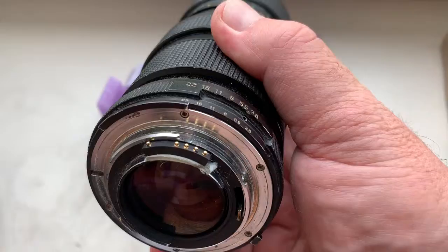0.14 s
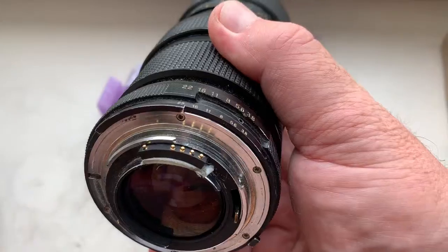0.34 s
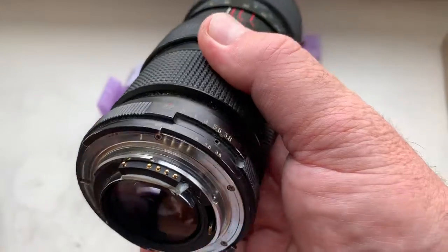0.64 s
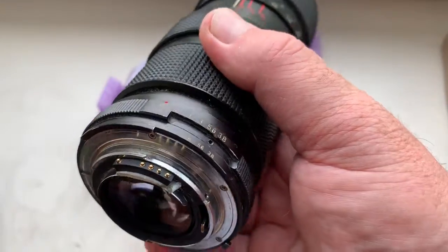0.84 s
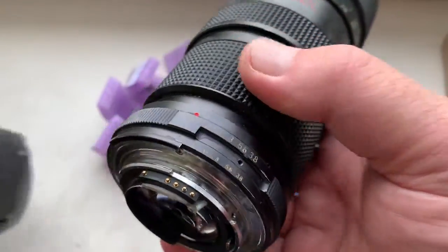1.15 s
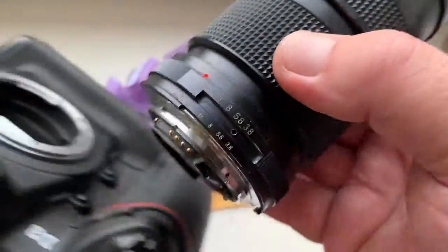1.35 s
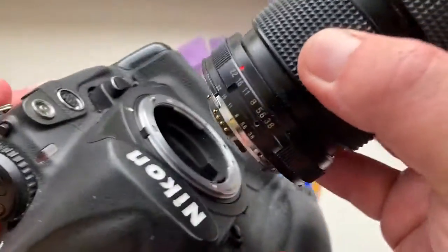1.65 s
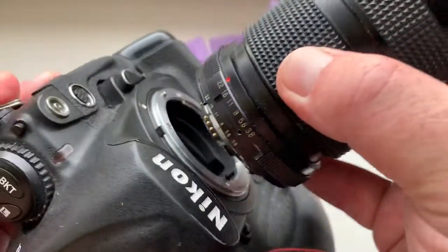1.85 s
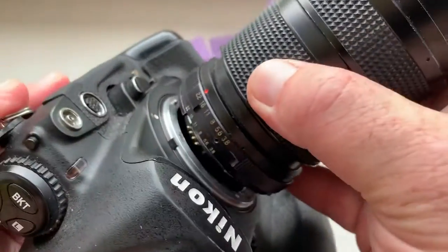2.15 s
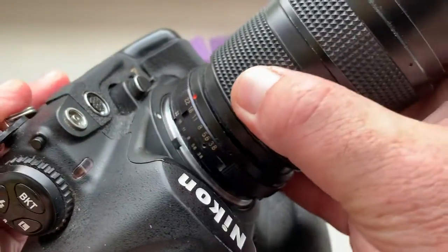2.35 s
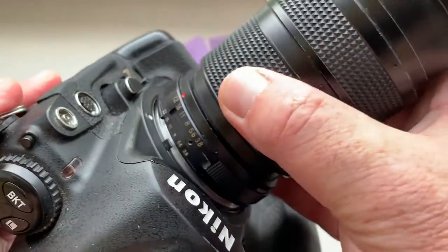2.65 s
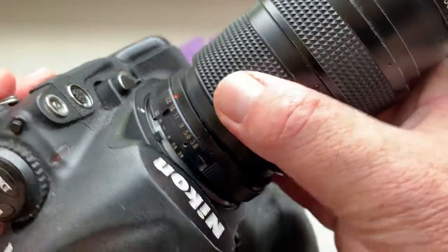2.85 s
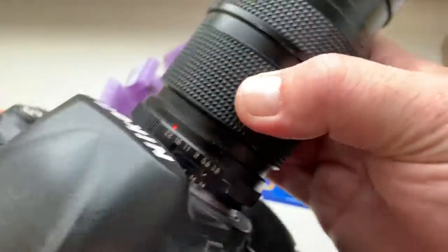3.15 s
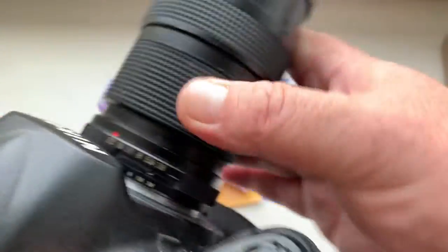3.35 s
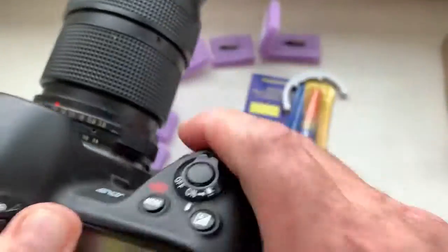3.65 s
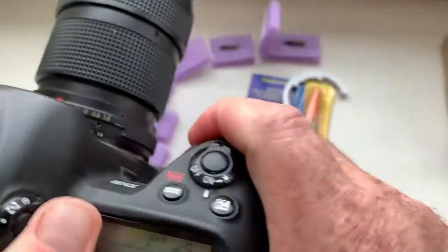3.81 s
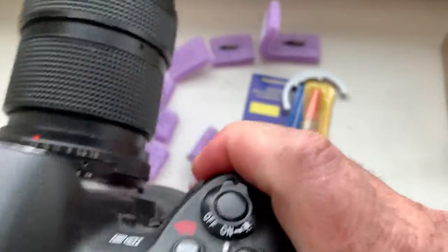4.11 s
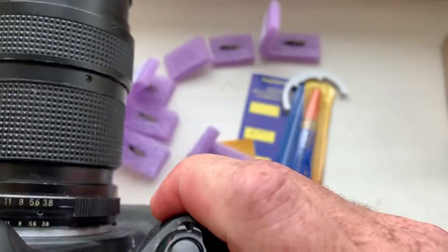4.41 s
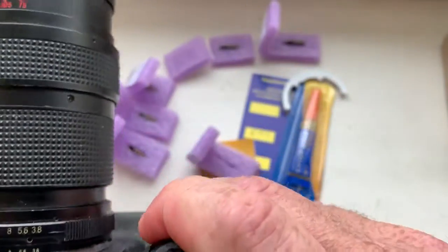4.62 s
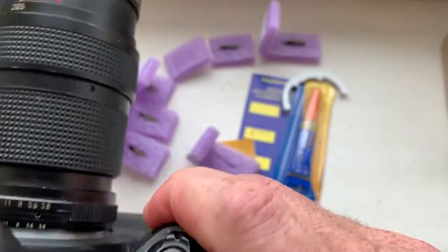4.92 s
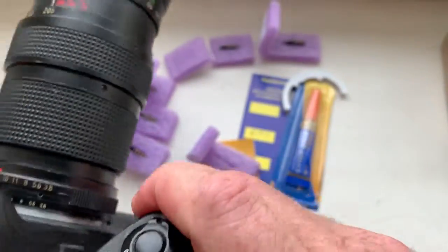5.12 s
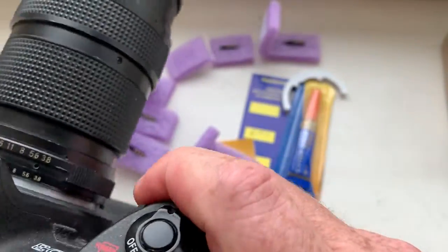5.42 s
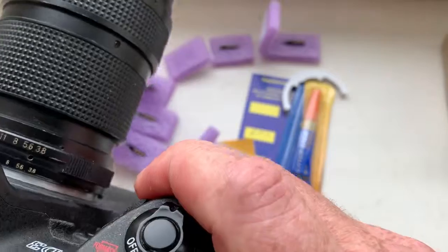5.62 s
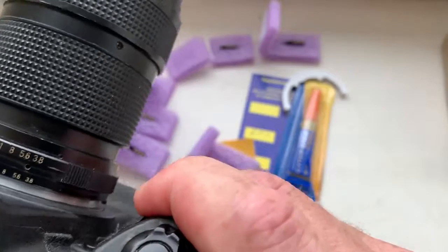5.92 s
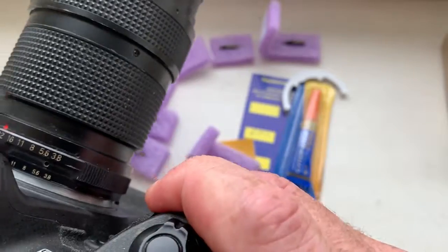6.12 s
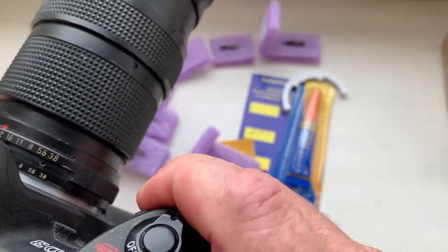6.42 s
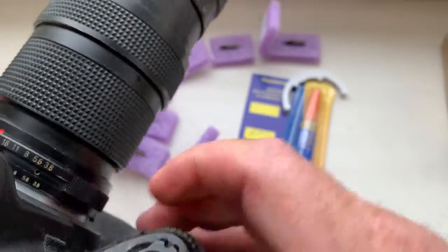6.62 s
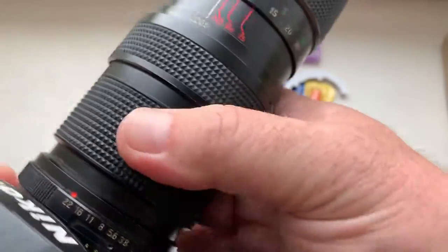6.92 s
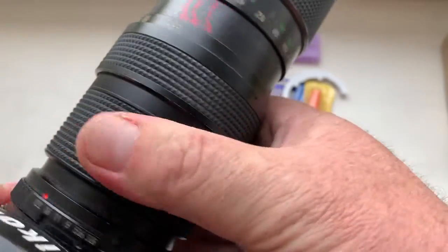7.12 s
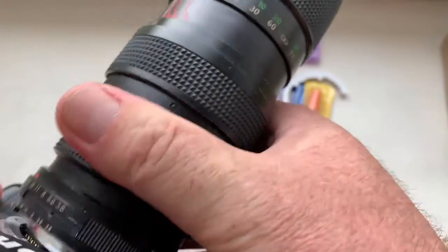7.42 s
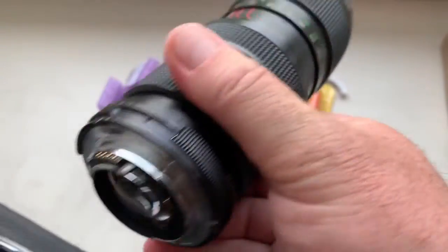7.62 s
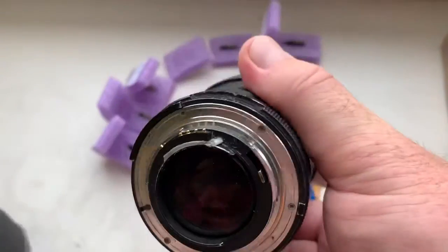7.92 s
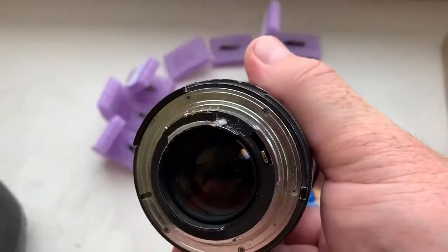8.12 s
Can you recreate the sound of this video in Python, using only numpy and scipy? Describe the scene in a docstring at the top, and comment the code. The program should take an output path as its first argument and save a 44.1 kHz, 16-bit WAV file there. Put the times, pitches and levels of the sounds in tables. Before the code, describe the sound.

Heard close by a phone, a lens meets a camera mount with ragged metallic clacks, knocks through a hollow shell and gritty twisting. A sharp crack locks it. Fingers then make light, crisp ticks and soft scuffs, with one stronger snap, before rapid clicks and scraping as the lens comes off. A low wooden thud closes it. Short small-room tail, low murmur of moving hands.

```python
"""A metal lens is fitted to a camera body, locked, handled and taken off again, close under a phone in a quiet room.
Contacts click as ragged bursts of noise through mount rings and camera shell; the bayonet and fingers scrape in
stick-slip grains. Bumps ring the table and set a hollow resonance near 380 Hz humming, and the locking pin sings.
Shifting hands murmur as banded noise over a faint air hiss. The left port hears the direct sound a little late,
and a short diffuse tail follows the clicks, scrapes and bumps."""
import sys
import numpy as np
from scipy import signal
from scipy.fft import rfft, irfft, next_fast_len
from scipy.io import wavfile
from scipy.ndimage import uniform_filter1d

SR = 44100
rng = np.random.default_rng(int(sys.argv[2]) if len(sys.argv) > 2 else 0)


def wav_record(signal):
    """Record a signal, one row per channel, as 16-bit PCM in the file named by sys.argv[1]."""
    frames = np.transpose(np.atleast_2d(signal))
    bounded = np.clip(frames, -1, 1)
    # unit amplitude maps onto the largest positive 16-bit level
    quanta = np.round(bounded * 32767).astype(np.int16)
    wavfile.write(sys.argv[1], SR, quanta)


N = 364221
T = np.arange(N) / SR  # time in s
M = next_fast_len(N + 4096)  # padded length for the spectra
F = np.fft.rfftfreq(M, 1 / SR)  # frequency in Hz
PORT_LAG = 11.5  # samples by which the left port hears later
LATE = 2j * np.pi * F * PORT_LAG / SR


def undb(db):
    """Decibels to an amplitude factor."""
    return 10 ** (np.asarray(db) / 20)


def band(x, lo_hz, hi_hz):
    """Keep the sound between two frequencies, with gentle slopes."""
    return signal.sosfilt(signal.butter(2, [lo_hz, hi_hz], "band", fs=SR, output="sos"), x)


def unit(x):
    """Scale to an RMS of one."""
    return x / np.sqrt(np.mean(x ** 2))


def top(x):
    """Scale to a peak of one."""
    return x / np.abs(x).max()


def fade(t, t60_s):
    """Exponential decay that falls 60 dB in t60_s."""
    return np.exp(-np.log(1000) * t / t60_s)


def ring(modes, t, spread):
    """Decaying modes; each blow lands elsewhere and wakes them in other shares, a little off pitch."""
    hz, db, t60_s = np.transpose(modes)[:, :, None]
    share, detune = rng.standard_normal((2, len(modes), 1))
    level = undb(db + 2 * share)
    tone = np.sin(2 * np.pi * hz * (1 + spread * detune) * t)
    return np.sum(level * tone * fade(t, t60_s), 0)


def add(track, s, x):
    """Mix a sound into the track, starting at s seconds."""
    i = int(s * SR)
    track[i:i + len(x)] += x[:N - i]


def over_hz(table, column=1):
    """Draw a table's column as a curve over log frequency."""
    points = np.array(table)
    return np.interp(np.log(np.maximum(F, 1)), np.log(points[:, 0]), points[:, column])


# Tone colour of the air: freq_hz, density_db (relative, per Hz)
AIR_COLOUR = [(15, -25.5), (28, 3), (60, 1), (160, -8.5), (300, -26), (380, -23.5), (1200, -29),
              (4000, -35), (8500, -41.5), (12000, -30), (16500, -46)]
# Likeness of left and right in the air: freq_hz, likeness (0 to 1)
AIR_ALIKE = [(60, .95), (300, .83), (640, .6), (1400, .05)]
AIR_DB = -78  # RMS of the mono sum from 200 to 16000 Hz, before the microphone's colour


def air():
    """Room tone and microphone hiss: shared in the bass, almost unrelated higher up."""
    alike = over_hz(AIR_ALIKE)
    mid, side = rfft(rng.standard_normal((2, M))) * undb(over_hz(AIR_COLOUR))
    left_right = np.array([[1], [-1]])
    x = irfft(mid * np.sqrt(1 + alike) + side * np.sqrt(1 - alike) * left_right, M)[:, :N]
    return undb(AIR_DB) * x / np.sqrt(np.mean(band(x.mean(0), 200, 16000) ** 2))


# Hands shifting weight, each a smooth swell: middle_s, width_s, deep_rumble_db, table_top_db, hollow_hum_db
SHIFTS = [(.5, 0.075, -49, -61.5, -70), (0.897, 0.098, -60.5, -61, -63), (1.13, 0.066, -85, -57.5, -122),
          (2.35, 0.17, -59, -89, -85), (2.901, 0.41, -75, -67, -68), (3.6, 0.25, -79.5, -67.5, -69.5),
          (4.65, 0.09, -50.5, -75.5, -84.5), (5.85, 0.12, -69, -73.5, -71.5), (6.102, 0.1, -54, -68, -81.5),
          (6.9, 0.097, -54.5, -86.5, -78.5), (7.351, 0.12, -60, -64, -59.5),
          (8.049, 0.15, -69.5, -74.5, -70.5)]
# Murmur while the hands lie still, one level each: deep_rumble_db, table_top_db, hollow_hum_db
RESTING_DB = [-67, -74, -85.5]


def hands():
    """Shifting weight keeps the table and the hollow murmuring, nearly alike at both ports."""
    swells = [undb(db)[:, None] * np.exp(-.5 * ((T - s) / width) ** 2) for s, width, *db in SHIFTS]
    deep, wood, hollow = undb(RESTING_DB)[:, None] + sum(swells)
    mid, side = rng.standard_normal((2, 3, N))
    noise = mid + .22 * side * np.array([1, -1])[:, None, None]
    rumble = unit(band(noise[:, 0], 30, 59))
    table_top = unit(band(noise[:, 1], 69, 180))
    hum = unit(band(noise[:, 2], 340, 390)) + 0.3 * unit(band(noise[:, 2], 360, 700))
    return deep * rumble + wood * table_top + hollow * hum


# Rubbing of rings and fingers: start_s, length_s, level_db, rise_db (over its length), treble_db
RUBS = [(0.312, 0.2, -75, 15, 2), (0.78, 0.3, -76, 8, -1), (1.752, 0.0068, -68.5, -15, -2.5),
        (2.596, 0.072, -59, 21, -0.5), (2.712, 0.081, -51.5, -10, -3), (2.79, 0.23, -64, 32, 1),
        (2.942, 0.4, -53.5, 7, -2), (3.321, 0.18, -68.5, 7.5, 7.5), (3.778, 0.16, -65, 12, 2),
        (4.191, 0.56, -78, -9, 4.5), (5.232, 0.057, -63, 13, -1.5), (5.333, 0.064, -65, 11.5, 5.5),
        (5.512, 0.041, -62, 10, 0), (5.638, 0.092, -60, 14, -10), (5.749, 0.38, -79, -1, -2),
        (6.409, 0.058, -72.5, -15.5, 2), (6.593, 0.17, -59, 4, 2.5), (6.891, 0.12, -75.5, 18, 4),
        (7.04, 0.16, -54, 15.5, -1), (7.17, 0.11, -51.5, -13, 3), (7.267, 0.22, -73, -9.5, -10),
        (7.426, 0.04, -51.5, 9, -4), (7.61, 0.27, -77.5, -1, 8.5)]
# Modes of the mount rings, rung by scrapes and clicks: pitch_hz, level_db (relative), t60_s
METAL = [(3010, -4, .04), (3750, -1, .035), (4200, -3, .03), (4750, -1, .03), (6000, -2, .03),
         (8290, -8, .02)]
GRIP_DETUNE = .07  # the grip shifts the pitch of rings and shell: spread as a share of the pitch
STROKE_DB = 2.5  # unevenness of the rubbing over some 10 ms


def scrape():
    """Dense stick-slip grains of uneven size, heard raw and through the mount rings."""
    dull, bright = np.zeros((2, N))
    for s, length, db, rise_db, treble_db in RUBS:
        count = int(length * SR)
        slope_db = rise_db * np.linspace(-.5, .5, count)
        pressure = undb(db + slope_db) * signal.windows.tukey(count, .45)
        add(dull, s, pressure)
        add(bright, s, pressure * undb(treble_db))
    # a new grain size every 60 samples, under a slower waver
    size_db = 4.9 * np.repeat(rng.standard_normal(N // 60 + 1), 60)[:N]
    stroke_db = STROKE_DB * unit(uniform_filter1d(rng.standard_normal(N), 500))
    grains = rng.standard_normal(N) * undb(size_db) * undb(stroke_db)
    rings = signal.fftconvolve(grains, ring(METAL, T[:400], GRIP_DETUNE))[:N]
    x = unit(grains) + .15 * unit(rings)
    low, mid, high = (unit(band(x, *edges)) for edges in [(500, 900), (1000, 6000), (5000, 16000)])
    return dull * (mid + 0.4 * low) + bright * high


# Contacts of metal and plastic: start_s, level_db, snap_centre_hz, brightness_db, knock_db, chatter_ms
# (brightness and knock relative to the snap; the first touch peaks after chatter_ms)
CLICKS = [(0.336, -49, 2260, 3.5, -15, 4.7), (0.345, -52.5, 890, -13, 1, 2.3),
          (0.417, -45, 2100, 1, -7, 1.3), (0.473, -52, 2900, -4, -15, 1.7),
          (0.8584, -49, 2500, 3.5, -7, 2.24), (0.954, -31, 2540, 6.5, -25, 1.8),
          (2.0751, -29, 2280, 8.5, -4, 1.22), (2.31, -30.5, 2460, -51, -6, 2.3),
          (2.3444, -20, 1460, -1.5, -10.5, 0.85), (2.389, -21, 3150, 1, -5, 0.67),
          (2.438, -40.5, 1017, -4.5, -2, 5.4), (2.4535, -23.5, 1900, 8.5, -10, 1.16),
          (2.585, -40, 4080, 8.5, -27, 1), (2.606, -36.5, 1400, -33, -1.5, 1.84),
          (2.663, -16.5, 3400, 7.5, 1, 1.6), (2.737, -35.5, 3370, 5.5, 12.5, 1.75),
          (2.756, -46.5, 3600, 4, 15.5, 3.9), (2.9357, -27, 2820, 8.5, -13.5, 1.76),
          (3.1766, -0.5, 4300, 2, -26, 1.1), (3.829, -57, 5050, 14, 7, 2.1),
          (3.8631, -32.5, 4930, 21.5, -3, 1.14), (4.001, -31.5, 3150, 15, -51, 0.7),
          (4.0127, -33.5, 4520, 10, -24, 2.04), (4.1603, -33.5, 4100, 9, -35, 4.2),
          (4.193, -39.5, 5800, 9.5, -26.5, 2.57), (5.005, -38, 3500, 2, -16, 3.4),
          (5.0192, -32.5, 3190, 15, -25, 2.04), (5.0984, -33.5, 3860, 7, -39, 1.06),
          (5.138, -43.5, 4260, 14.5, -31, 1.8), (5.15, -37, 3770, 5.5, -36.5, 1.25),
          (5.2759, -42.5, 2853, 8, -39.5, 2.07), (5.3624, -46.5, 2090, -22.5, -44.5, 2.5),
          (5.382, -54.5, 2410, 0.5, -31.5, 2.6), (5.527, -40.5, 5610, 4, -42, 2.5),
          (5.543, -46.5, 5070, 7, -13.5, 1.8), (5.663, -41, 2210, 3, -8.5, 2.1),
          (5.69, -44, 1210, 5.5, -4, 2.3), (5.716, -50, 1210, 0, -1.5, 3.1),
          (6.035, -63, 2120, -5, -33, 3.5), (6.095, -52, 1900, -2.5, -29, 1.54),
          (6.2072, -14, 4300, 3.5, -36, 1.42), (6.2271, -32, 3180, 10.5, -16, 1.93),
          (6.233, -42, 4170, 18.5, -28, 2.5), (6.3294, -44.5, 2355, 6.5, -44.5, 1.1),
          (6.4643, -44, 2330, -1.5, -30.5, 1.7), (6.4772, -38, 4210, -8, -33.5, 1.93),
          (6.668, -34.5, 4900, 4.5, -28, 1.9), (6.6775, -20.5, 5350, 8.5, -26.5, 1.67),
          (6.686, -29, 2030, -3, -31, 0.53), (6.6936, -35, 2720, 15, -28, 0.6),
          (6.7278, -22.5, 4590, 10.5, -30, 0.69), (6.748, -30.5, 4460, 7, -40, 2),
          (6.758, -27, 4660, 9.5, -31.5, 1.6), (6.778, -32.5, 5330, -22, -20, 0.41),
          (6.795, -36, 4330, 6.5, -40, 0.83), (7.1642, -32, 4660, -40, -9.5, 2.2),
          (7.26, -26.5, 3950, 8.5, -9, 0.99), (7.359, -54.5, 1526, -7.5, 15, 0.99),
          (7.4569, -40, 1860, -39, 15.5, 2.56), (7.647, -44, 3370, 12.5, -35, 1.17),
          (7.6975, -46, 2277, -22, -42.5, 0.98), (8.197, -23, 1025, -9.5, -2.5, 3.26)]
# Modes of the camera shell: pitch_hz, level_db (relative), t60_s
SHELL = [(265, 0, .03), (520, -5, .03), (715, -5, .022), (830, -7, .022), (1250, -16, .02)]
RATTLE_SHARE = .09
BROAD_SHARE = 0.45  # of the whole mount's crack beside the snap's own band
PING_CYCLES, PING_PART = 20, .25  # each contact's short note at its snap centre: cycles to fall 60 dB, share


def clicks():
    """A few milliseconds of ragged chatter crack directly, ring the mount briefly and knock the camera shell."""
    out, t = np.zeros(N), T[:int(.15 * SR)]
    for s, db, hz, bright_db, knock_db, ms in CLICKS:
        u = t / (ms / 1000)
        ragged = undb(4.5 * np.repeat(rng.standard_normal(len(t) // 16 + 1), 16)[:len(t)])
        # the first touch, then a weaker rattle as the parts settle
        touch = u ** 2 * np.exp(-2 * u)
        rattle = RATTLE_SHARE * np.minimum(u, 1) * np.exp(-u / 6)
        chatter = rng.standard_normal(len(t)) * ragged * (touch + rattle)
        rings = signal.fftconvolve(chatter, ring(METAL, t, GRIP_DETUNE))[:len(t)]
        metal = top(chatter) + 0.1 * top(rings)
        metal = band(band(metal, 800, 18000), 700, 19000)  # small parts carry no bass
        whole = band(metal, 1000, 6500)
        note = np.sin(2 * np.pi * hz * t) * fade(t, PING_CYCLES / hz)
        ping = signal.fftconvolve(chatter, note)[:len(t)]
        crack = top(band(metal, hz / 2.04, hz * 1.5) + BROAD_SHARE * whole)
        snap = top(crack + PING_PART * top(ping))
        bright = top(band(metal, 6000, 16500))
        shell = top(signal.fftconvolve(chatter, ring(SHELL, t, GRIP_DETUNE))[:len(t)])
        add(out, s, undb(db) * (snap + undb(bright_db) * bright + undb(knock_db) * shell))
    return out


# Bumps on the table: start_s, thud_db, hollow_hum_db
BUMPS = [(0.343, -40, -52.5), (0.388, -43, -49.5), (0.445, -42.5, -48), (0.468, -50.5, -51),
         (0.496, -45, -61), (0.532, -54, -66), (2.074, -31, -26.5), (2.311, -36.5, -33),
         (2.347, -57, -34.5), (2.386, -40, -32), (2.455, -38, -45.5), (2.608, -67, -47), (2.664, -38, -29),
         (2.737, -43, -32.5), (2.762, -40, -36), (3.021, -63, -46), (3.179, -56, -28.5),
         (3.8, -50.5, -53.5), (3.992, -47.5, -81.5), (5.4, -57, -58.5), (5.664, -41, -57.5),
         (5.866, -67.5, -63), (7.265, -54.5, -37.5), (7.356, -49, -41), (7.458, -65, -34),
         (8.198, -3.5, -12)]
# Modes of the table top: pitch_hz, level_db (relative), t60_s
TABLE = [(106, -2.5, 0.16), (169.2, -4.5, 0.13), (301, -9, 0.13), (482, -16.5, 0.067), (733, -24, 0.2),
         (824, -22, 0.064), (988, -22.5, 0.06), (1216, -27.5, 0.09)]
HOLLOW_HZ, HOLLOW_T60_S, HOLLOW_SWELL_S = 376.2, 0.13, 0.0054
THUD_LO_HZ, THUD_HI_HZ, THUD_SHARE = 177, 380, 0.6  # rough noise beside the ringing wood


def table():
    """Each bump rings the table top with a rough, short thud, and the hollow swells after."""
    out, t = np.zeros(N), T[:int(.4 * SR)]
    swell = 1 - np.exp(-(t / HOLLOW_SWELL_S) ** 2)
    for s, db, hum_db in BUMPS:
        noise = rng.standard_normal(len(t))
        rough = band(noise * fade(t, 0.065), THUD_LO_HZ, THUD_HI_HZ) * np.minimum(t / 0.0093, 1)
        wood = ring(TABLE, t, 0.0041) * np.minimum(t / 0.008, 1)
        hum = top(swell * fade(t, HOLLOW_T60_S) * np.sin(2 * np.pi * HOLLOW_HZ * t))
        thud = top(wood) + THUD_SHARE * top(rough)
        add(out, s, undb(db) * thud + undb(hum_db) * hum)
    return out


ROOM_T60_S, ROOM_TREBLE_T60_S, ROOM_DB = 0.11, 0.11, -9
LINGER_T60_S, LINGER_DB = 0.37, -21.5  # slower second stage of the tail, below the treble
TAIL_STEP_S = .06  # time from one random tail to the next


def room(x):
    """Diffuse tail, other for each port, crossfading steadily through six random tails so no pitch stands out;
    only its lows linger."""
    t, out = T[:int(.4 * SR)], 0
    for turn in range(6):
        feed = np.maximum(1 - np.abs((T / TAIL_STEP_S - turn + 3) % 6 - 3), 0)  # this tail's turn in the cycle
        noise = rng.standard_normal((2, 2, len(t)))
        low, high = band(noise[0], 150, 6200), band(noise[1], 6200, 16500)
        low_tail = low * (fade(t, ROOM_T60_S) + undb(LINGER_DB) * fade(t, LINGER_T60_S))
        high_tail = 0.033 * high * fade(t, ROOM_TREBLE_T60_S)
        tail = (low_tail + high_tail) * np.minimum(t / 0.00082, 1)
        tail = tail / np.sqrt(np.sum(tail[0] ** 2))
        out = out + signal.fftconvolve((x * np.sqrt(feed))[None], tail, axes=1)[:, :N]
    return undb(ROOM_DB) * out


# Balance of the two ports: freq_hz, left_minus_right_db, left_lag_rad (beyond the port lag)
PORTS = [(20, .8, 0), (200, .8, -.3), (700, 3, -1), (1500, 5.5, -1.4), (3000, 2, -.3), (4100, 1, .4),
         (6100, -4, -1.8), (7000, 0, 0)]


def ports(x):
    """The phone body shades and delays the two ports unequally."""
    half = undb(over_hz(PORTS) / 2)
    left = half * np.exp(-LATE - 1j * over_hz(PORTS, column=2))
    return irfft(rfft(x, M) * np.array([left, 1 / half]), M)[:, :N]


LOCK_S, LOCK_HZ, LOCK_DB, LOCK_T60_S = 3.18, 2690, -36, .36


def pin():
    """The sprung locking pin sings after it snaps home: one thin, decaying sine."""
    out, t = np.zeros(N), T[:SR // 2]
    add(out, LOCK_S, undb(LOCK_DB) * fade(t, LOCK_T60_S) * np.sin(2 * np.pi * LOCK_HZ * t))
    return out


def scene():
    """Handling heard directly and through the room, over the murmur and the air; the pin is heard directly only."""
    near = clicks() + scrape() + table()
    return ports(near + pin()) + room(near) + hands() + air()


# Tone colour of the microphone: freq_hz, gain_db
MIC = [(1000, -1), (2700, 0), (5000, 0), (6000, 4), (8500, 3.5), (12000, -5.5), (16000, -12.5)]
SHARED_FROM_HZ = 6800  # above this the left channel takes its treble from the right
TOP_HZ = 16800


def record(dry):
    """The microphone colours the sound, shares the right's high treble late on the left, rounds the loudest peaks
    and cuts off the extreme top."""
    left, right = rfft(dry, M) * undb(over_hz(MIC))
    share = 1 / (1 + (SHARED_FROM_HZ / np.maximum(F, 1)) ** 16)
    left = (1 - share) * left + share * right * np.exp(-LATE)
    x = irfft([left, right], M)[:, :N]
    return signal.sosfilt(signal.ellip(10, .2, 70, TOP_HZ, fs=SR, output="sos"), np.tanh(x))


dry = scene()
out = record(dry)
wav_record(out)
```